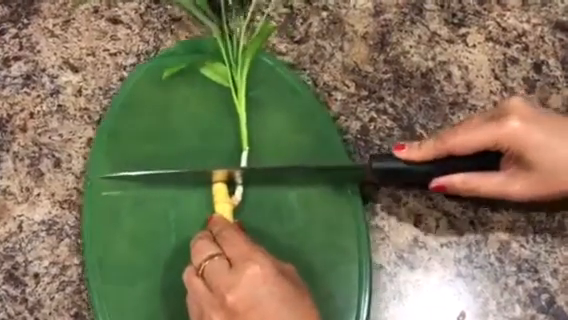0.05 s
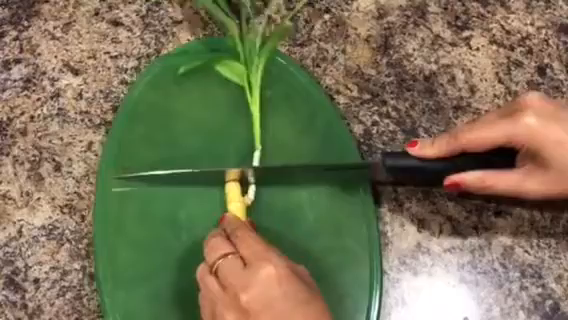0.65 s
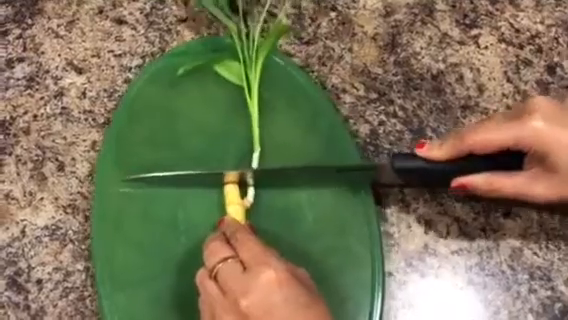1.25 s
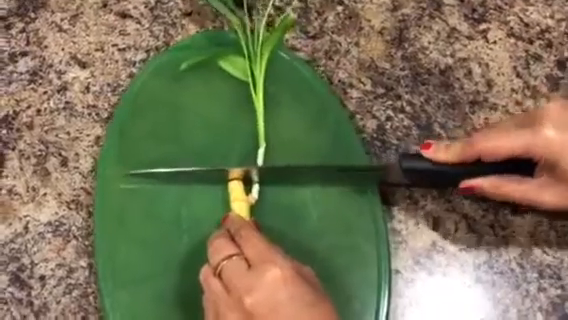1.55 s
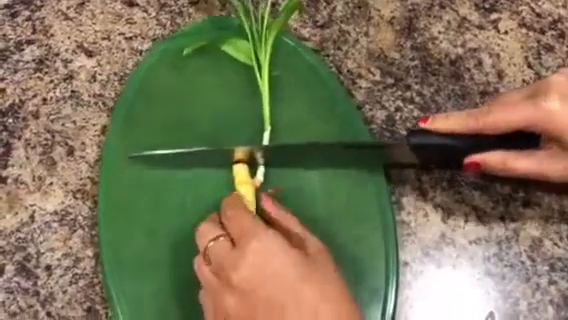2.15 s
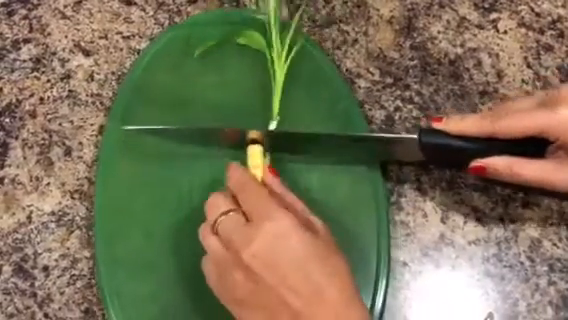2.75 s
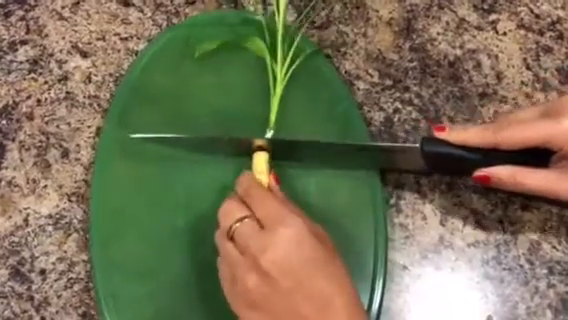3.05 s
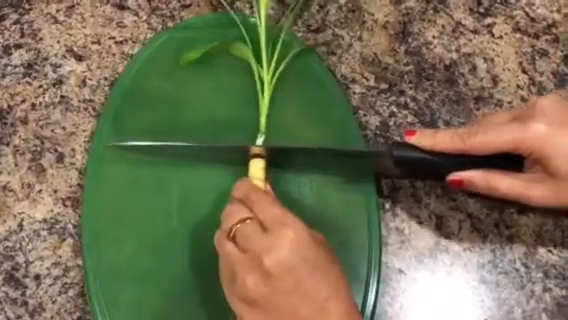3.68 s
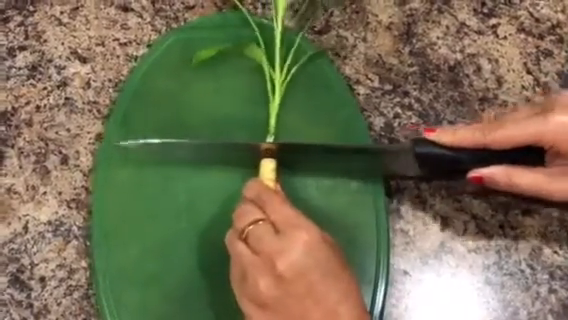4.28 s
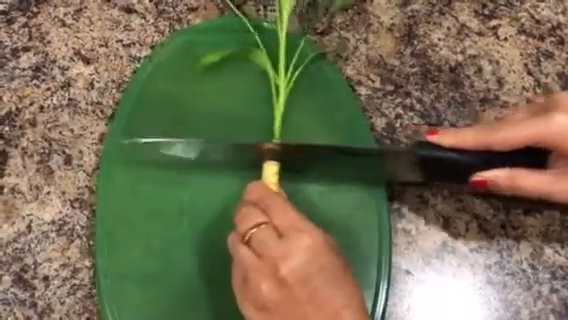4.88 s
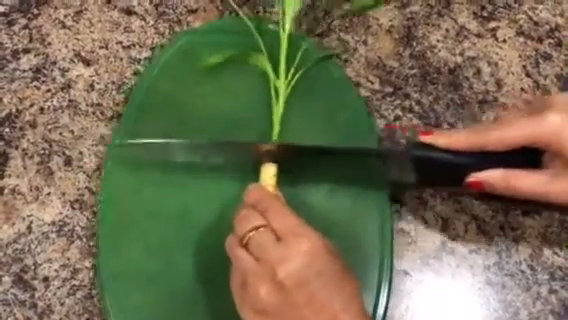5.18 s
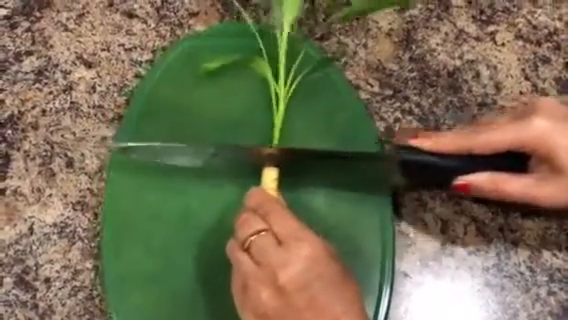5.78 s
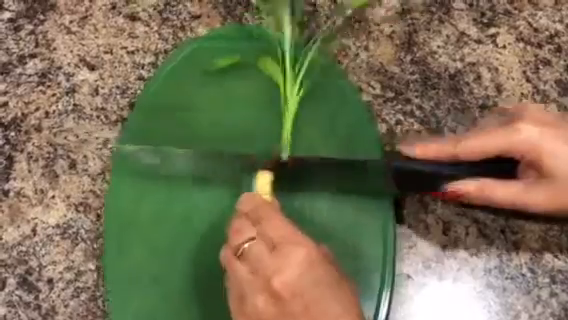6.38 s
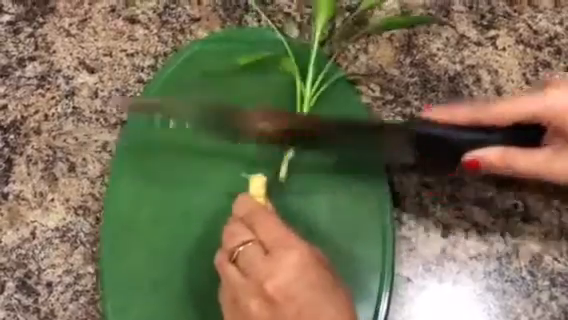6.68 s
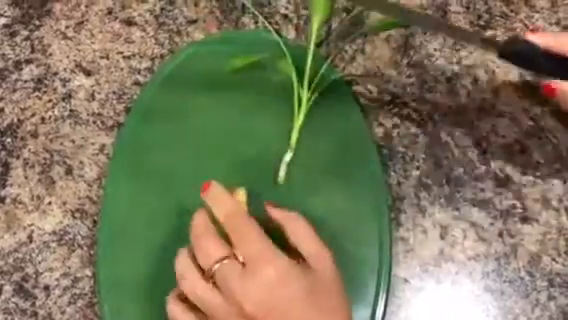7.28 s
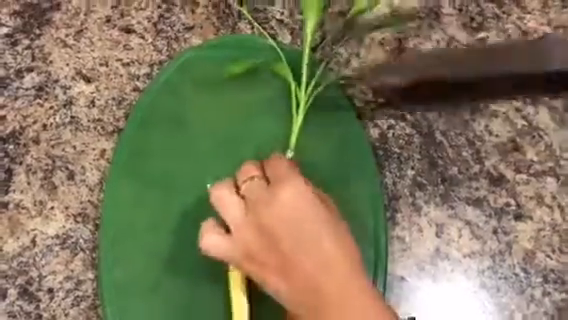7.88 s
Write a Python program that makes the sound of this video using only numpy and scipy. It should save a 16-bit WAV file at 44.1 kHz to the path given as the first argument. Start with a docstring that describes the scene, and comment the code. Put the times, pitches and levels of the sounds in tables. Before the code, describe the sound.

A few faint knife scrapes, ticks and a dull thud on a plastic cutting board lead into about three seconds of fast sawing through a fibrous stem. Small snaps build until the blade cracks down on the board, the loudest moment, followed by light handling taps. The microphone is close, with low kitchen room noise and an appliance humming behind.

```python
"""Sawing a stem on a cutting board

A kitchen, one small microphone close to a plastic board. A serrated knife saws through a plant stem
in runs of tiny slips: fibres hiss and snap, the blade rasps and the board drones underneath.
The stem rocks and knocks, then gives way, and the blade chops down; a hand gathers the pieces.
Behind it all, low room noise and the hum of an appliance."""
import sys
import numpy as np
from scipy import signal
from scipy.fft import rfft, irfft
from scipy.io import wavfile

SR = 44100
rng = np.random.default_rng(int(sys.argv[2]) if len(sys.argv) > 2 else 0)


def dump_mix(stems):
    """Bounce the given channels to the path in sys.argv[1] as a 16-bit WAV at rate SR."""
    frames = np.atleast_2d(stems).T  # one column per channel
    limited = np.clip(frames, -1, 1)  # hard clip at full scale
    pcm = np.round(limited * 32767).astype(np.int16)
    wavfile.write(sys.argv[1], SR, pcm)


N = 354255

# Close to the microphone, the blade saws to and fro about six strokes a second: t/s, length/s, force/dB
STROKES = [(3.304, .11, -52.5), (3.506, 0.068, -53), (3.668, 0.099, -54), (3.844, .11, -56),
           (4.02, 0.12, -51.5), (4.197, 0.1, -55), (4.35, .12, -51), (4.539, 0.088, -56),
           (4.686, 0.16, -50.5), (4.853, .13, -52), (5.026, .14, -50), (5.19, .11, -52), (5.323, 0.16, -51),
           (5.481, 0.17, -55), (5.652, .13, -50), (5.812, 0.12, -54.5), (5.951, .13, -50.5),
           (6.104, 0.16, -54), (6.262, .15, -51.5), (6.405, 0.16, -54)]
# From springy skin into woody core: t/s, drone/dB re force, rasp/dB re force, fizz of the wedged blade/dB
CUT_DEPTH = [(3.3, 3, -10, -65), (4.05, 10, -1.5, -66.5), (4.72, 10.5, -2, -62), (4.88, -1.5, -7.5, -67),
             (5.08, 7, 5, -54), (5.25, 2.5, -2.5, -63), (6.4, 6.5, 0, -59)]
# Light draws of the blade and brushes of the hand: t/s, length/s, rasp/dB, fibre hiss/dB
SCRAPES = [(0, 0.095, -55.5, -70), (0.124, 0.18, -61, -58.5), (0.33, 0.15, -55.5, -55.5),
           (0.534, .11, -46.5, -61), (0.601, 0.094, -53, -63), (0.703, 0.12, -57, -63.5),
           (0.933, 0.13, -62, -56), (1.193, 0.048, -59, -56.5), (1.237, 0.086, -64, -67),
           (1.762, 0.081, -64, -72), (2.154, 0.082, -65, -64), (2.273, 0.076, -66, -63.5),
           (2.324, 0.29, -61.5, -67), (2.745, .17, -66, -53), (2.968, 0.069, -68.5, -58),
           (3.05, 0.056, -75, -62.5), (6.48, .16, -54, -55.5), (7.802, .15, -68, -64)]


def sawing(freed_s=6.48, hiss_end_s=6.895, lingering_hiss_db=-65, leaves_db=-76.5):
    """Every stroke swells and fades with blade speed and drives the board, the rasp and the hiss."""
    t = np.arange(N) / SR
    depth_s, *depth = np.transpose(CUT_DEPTH)
    drone_db, rasp_db, wedged_db = (np.interp(t, depth_s, column) for column in depth)
    force = sum(amp(db) * blade_speed(t, start, length, fastest=0.17) for start, length, db in STROKES)
    drives = np.array([amp(drone_db) * force, amp(rasp_db) * force, force])
    for start, length, scrape_db, hiss_db in SCRAPES:
        speed = blade_speed(t, start, length, fastest=0.5)
        drives += np.outer(amp([scrape_db + 1.5, scrape_db, hiss_db]), speed)
    catch_db = 2.7 * noise_band(8.3, 89, order=1)  # the teeth catch and let go
    drone_drive, rasp_drive, hiss_drive = drives * unit_rms(amp(catch_db))
    drone, rasp = board_drone(), blade_rasp()
    # the handled plant and the wedged blade fizz; a faint hiss lingers after the chop, then cuts off
    stages = [t < depth_s[0], t < freed_s, t < hiss_end_s]
    fizz = amp(np.select(stages, [leaves_db, wedged_db, lingering_hiss_db], leaves_db - 3.5))
    press_db = np.interp(t, [4, 5], [-18, -2])  # the hand bears down harder as the cut deepens
    rumble = amp(press_db) * (t < freed_s) * noise_band(48, 97)
    return drone_drive * (drone + rumble) + rasp_drive * rasp + np.hypot(hiss_drive, fizz) * fibre_hiss()


def blade_speed(t, start, length, fastest):
    """One movement from rest to rest; `fastest` is the share of its length at which it peaks."""
    return np.sin(np.pi / 2 * np.interp((t - start) / length, [0, fastest, 1], [0, 1, 0]))


def slips(per_s, spread_db, smooth):
    """Random tiny slips of uneven size over a share of smooth rubbing."""
    sizes = amp(spread_db * np.minimum(rng.exponential(1, N), 4)) * rng.choice([-1, 1], N)
    ticks = unit_rms(sizes * (rng.random(N) < per_s / SR))
    return unit_rms(ticks + smooth * rng.standard_normal(N))


def board_drone():
    """Slips keep the board ringing under the cut, mixed with dull rubbing."""
    ring = board_ring(np.arange(SR // 4) / SR, damping=1.0, scatter_db=4.5)
    ringing = unit_rms(signal.oaconvolve(slips(per_s=590, spread_db=5, smooth=0.27), ring)[:N])
    rub = slips(per_s=700, spread_db=2.5, smooth=0.45)
    spectrum = [(150, -32.5), (240, -6.5), (320, 5), (620, -2.5), (900, -4), (1200, -17.5),
                (2000, -23.5), (5000, -48.5)]
    return unit_rms(colour(ringing + amp(1.5) * rub, spectrum))


# The teeth in the stem, heard close: f/Hz, level/dB
RASP_SPECTRUM = [(400, -42.5), (800, -3), (1050, 2.5), (1500, 3.5), (2000, -4), (2700, -11), (4000, -12.5),
                 (8000, -41)]


def blade_rasp():
    """Dense slips of the teeth merge into a midrange rasp."""
    return unit_rms(colour(slips(per_s=1500, spread_db=-1.5, smooth=0.24), RASP_SPECTRUM))


# Fibres tearing in the cut: f/Hz, level/dB
HISS_SPECTRUM = [(700, -30), (2000, -1.5), (3200, -5.5), (4800, -4), (5800, 1.5), (7200, -1), (7600, -6),
                 (8300, 0.5), (9700, -1), (10600, -7.5), (11600, -1), (15500, -7), (17000, -10.5)]


def fibre_hiss(bands=7):
    """Tearing fibres crackle: each thickness ticks in its own band, a few break with a broad click."""
    edges_hz = np.linspace(1500, 17000, bands + 1)
    narrow = sum(band(slips(per_s=590, spread_db=-0.5, smooth=0.46), lo, hi, order=2)
                 for lo, hi in zip(edges_hz, edges_hz[1:]))
    broad = slips(per_s=360, spread_db=0.5, smooth=0.2)
    return unit_rms(colour(unit_rms(narrow) + amp(-4.5) * broad, HISS_SPECTRUM))


# Thick fibres snapping and steel ticking, close by: t/s, peak level/dB
THICK_SNAPS = [(.373, -34), (.383, -36), (.417, -29.5), (.801, -41), (1.2022, -35.5), (1.211, -45),
               (1.519, -54), (2.0565, -47), (2.8392, -30.5), (3.318, -32), (3.5226, -35.5), (3.8717, -30),
               (4.0304, -33.5), (4.4328, -35), (5.1357, -34), (5.3996, -29), (5.549, -28.5), (5.666, -36),
               (5.678, -28), (6.024, -28), (6.147, -28.5), (6.1735, -31), (6.299, -24.5), (6.3336, -19.5),
               (6.4516, -11.5), (6.4766, -4.5), (6.4826, -8)]
# One snap: f/Hz, level/dB
SNAP_SPECTRUM = [(300, -27), (1500, -13), (2500, -3), (3400, -4.5), (4600, -4.5), (6000, 0), (8000, 0),
                 (10000, -2), (13000, -1), (17000, -11.5)]


def snaps(thin_per_stroke=2, thin_re_force_db=15):
    """A fibre parts with a sharp tick and brief splintering; thin ones go at random in every stroke."""
    t, out = np.arange(SR // 20) / SR, np.zeros(N)
    splinters = (np.exp(-t / 0.001) + 0.25 * np.exp(-t / 0.0045)) * (1 - np.exp(-t / 0.0002))
    thin_snaps = [(start + length * rng.beta(2, 2), rng.normal(force_db + thin_re_force_db, 1.5))
                  for start, length, force_db in STROKES for _ in range(thin_per_stroke)]
    for start, peak_db in THICK_SNAPS + thin_snaps:
        tick = colour(rng.standard_normal(len(t)) * splinters, SNAP_SPECTRUM)
        add(out, start, amp(peak_db) * tick / abs(tick).max())
    return out


# The blade breaks through in quick cracks, close by: t/s, level/dB
CHOP_CRACKS = [(6.476, -14), (6.4836, -18.5), (6.489, -24.5)]
# One crack: f/Hz, level/dB
CRACK_SPECTRUM = [(40, -14.5), (120, -2), (200, 5), (300, 2), (450, 5), (520, 4.5), (650, -2), (830, 1.5),
                  (1100, 2), (1500, 3), (2000, -5.5), (2600, -0.5), (3200, -6), (4000, -9), (7000, -15.5),
                  (16000, -34)]


def chop():
    """The blade breaks through the last of the stem and cracks down on the board."""
    t, out = np.arange(SR // 3) / SR, np.zeros(N)
    for start, db in CHOP_CRACKS:
        burst = rng.standard_normal(len(t)) * np.exp(-t / 0.0049)
        add_hit(out, start, db, colour(burst, CRACK_SPECTRUM))
    return out


def board_slap():
    """The chop drives the board against the counter, where it rings."""
    t, out = np.arange(SR // 3) / SR, np.zeros(N)
    ring = board_ring(t, damping=1.15, scatter_db=0.5) * (1 - np.exp(-t / 0.004))
    add_hit(out, start=6.479, db=-14, sound=ring)
    return out


# The stem rocks and knocks on the board, close by: t/s, body level/dB, note f/Hz
STEM_KNOCKS = [(.19, -50, 261), (.417, -41.5, 320), (2.354, -51.5, 900), (2.419, -48, 313),
               (2.496, -47, 430), (2.617, -40.5, 340), (2.638, -43, 400), (2.666, -44, 490),
               (2.712, -46, 784), (2.992, -50, 270), (3.318, -44.5, 303), (3.521, -44.5, 960),
               (3.682, -34.5, 320), (3.692, -32, 308), (4.029, -34, 617), (4.057, -33, 614),
               (4.388, -37, 613), (4.42, -38.5, 400), (4.702, -46, 450), (4.737, -43, 560),
               (5.038, -48, 820), (6.28, -43.5, 874), (6.334, -45.5, 300), (6.897, -51, 427),
               (7.371, -35, 288), (7.387, -41.5, 359), (7.535, -50.5, 332), (7.743, -52, 407),
               (7.825, -51, 399), (7.999, -44, 816)]
# A hard contact on the board: f/Hz, level/dB
CLACK_SPECTRUM = [(400, -30), (1100, 3.5), (1600, 2.5), (2500, -8), (4000, -11.5), (7000, -15.5),
                  (16000, -31)]


def stem_knocks():
    """The pressed stem gives a short woody note; weight adds a thump, hardness a clack."""
    t, out = np.arange(SR // 3) / SR, np.zeros(N)
    for start, body_db, hz in STEM_KNOCKS:
        ring, blow = contact(t)
        note = np.sin(2 * np.pi * hz * t) * np.exp(-t / 0.006) * (1 - np.exp(-t / 0.0004))
        body = unit_rms(note) + amp(-1.5) * unit_rms(band(blow, hz / 1.69, hz * 1.6, order=2))
        thump = band(ring, 41, 210)
        squash_db = 0.56 * (body_db + 42.5)  # harder knocks squash the stem, so the clack grows less
        add_hit(out, start, body_db, body)
        add_hit(out, start, body_db - 15.5, thump)
        add_hit(out, start, body_db - 11.5 - squash_db, colour(blow, CLACK_SPECTRUM))
    return out


# The board is pressed down onto the counter: t/s, thump level/dB, clack level/dB
BOARD_THUDS = [(1.047, -51, -66), (1.519, -24, -37), (7.373, -44, -63)]
# The clack between board and counter: f/Hz, level/dB
COUNTER_SPECTRUM = [(400, -10), (1100, -4), (1550, 3), (1900, -6), (2500, -3), (3300, -11.5), (4500, -13),
                    (7000, -22), (16000, -37)]


def board_thuds():
    """The board flexes and meets the counter: a clack, a quickly falling note and a low ring."""
    t, out = np.arange(SR // 3) / SR, np.zeros(N)
    bend_hz = 215 + 380 * np.exp(-t / 0.00302)  # bending waves: the short ones arrive first
    envelope = np.exp(-t / 0.0075) * (1 - np.exp(-t / 0.0015))
    bend = unit_rms(np.sin(2 * np.pi * np.cumsum(bend_hz) / SR) * envelope)
    for start, thump_db, clack_db in BOARD_THUDS:
        ring, blow = contact(t)
        low_ring = amp(-5) * unit_rms(band(ring, 45, 106)) + amp(-6) * unit_rms(band(ring, 113, 645))
        add_hit(out, start, thump_db, bend + low_ring)
        add_hit(out, start, clack_db, colour(blow * np.exp(-t / 0.0034), COUNTER_SPECTRUM))
    return out


def contact(t):
    """One tap somewhere on the board: (its ring, the ring with the crunch of the rough contact)."""
    ring = board_ring(t, damping=0.96, scatter_db=6)
    crunch = rng.standard_normal(len(t)) * np.exp(-t / 0.0086)
    return ring, ring + amp(10.5) * crunch


# Modes of the plastic board lying on the counter: f/Hz, level/dB, t60/s at damping 1
BOARD_MODES = [(62.4, -11, 0.18), (140, 1.5, 0.1), (223, -4, .11), (299, -1.5, 0.12), (363, -6.5, 0.055),
               (487, -3.5, 0.063), (567, -12, 0.083), (646, -3, 0.061), (836, 4.5, 0.071), (903.4, -5, .08),
               (1056, -3, 0.07), (1178, -4.5, 0.036), (1332, -9, 0.03), (1592, -5.5, .045),
               (1850, -6.5, 0.09), (2313, -4, 0.071), (2498, -6.5, 0.058), (2590, -11, .05),
               (3300, 1.5, 0.033), (3300, -9.5, 0.037), (4100, -13.5, 0.095)]


def board_ring(t, damping, scatter_db):
    """The board's answer to one tap; each spot favours other modes."""
    hz, db, t60 = np.transpose(BOARD_MODES)[:, :, None]
    spot_db = scatter_db * rng.standard_normal(hz.shape)
    sign = rng.choice([-1, 1], hz.shape)
    envelopes = amp(db + spot_db - 60 * damping * t / t60)
    return (sign * envelopes * np.sin(2 * np.pi * hz * t)).sum(0)


def kitchen_reverb(x, tails=5, turn_s=0.005):
    """Bass rings in one room tail; treble is spread over several in quick rotation and fades smoothly."""
    turns = np.arange(N) / (turn_s * SR)
    bass, treble = band(x, 30, 560), band(x, 600, 20000)
    wet = signal.fftconvolve(bass, room_tail())
    for k in range(tails):
        share = np.maximum(np.cos(2 * np.pi * (turns - k / tails)), 0)
        wet += signal.fftconvolve(treble * share, room_tail())
    spectrum = [(30, -15.5), (100, -7), (400, -12), (1200, -15.5), (3000, -17), (7000, -18),
                (14000, -20.5)]
    return colour(wet[:N], spectrum)


# Decay of the kitchen around the microphone: f/Hz, t60/s
KITCHEN_DECAY = [(80, 0.57), (300, 0.26), (1000, 0.64), (2500, 0.53), (6000, .42), (14000, 0.32)]


def room_tail():
    """Sparse reflections of random sign, each band dying at its own speed."""
    taps = np.zeros(SR)
    slots = np.arange(SR // 200, SR - 20, 20)
    taps[slots + rng.integers(0, 20, len(slots))] = rng.choice([-1., 1.], len(slots))
    hz, t, bands = signal.stft(taps, SR, nperseg=256)
    decay = amp(-60 * t / curve_at(KITCHEN_DECAY, hz)[:, None])
    tail = signal.istft(bands * decay, SR, nperseg=256)[1]
    return tail / np.linalg.norm(tail)


# The kitchen's own noise at the microphone: f/Hz, relative level/dB
ROOM_TONE_SPECTRUM = [(15, -45), (25, -25), (43, -4), (66, 0), (87, -20), (123, 1.5), (149, -8),
                      (229, -12.5), (256, -14), (1130, -30), (1230, -30), (2110, -36.5), (3080, -38.5),
                      (3340, -40), (16000, -54.5)]
# An appliance in the background: f/Hz, level/dB
APPLIANCE_HUM = [(55, -58), (119, -68)]


def room_tone(noise_db=-51.5, whine_db=-79):
    """Low room noise with a wavering appliance hum and a soft whine."""
    t = np.arange(N) / SR
    gains = amp(curve_at(ROOM_TONE_SPECTRUM, np.fft.rfftfreq(N, 1 / SR)))
    out = amp(noise_db) * unit_rms(irfft(rfft(rng.standard_normal(N)) * gains, N))
    for hz, db in APPLIANCE_HUM:
        waver = np.interp(t, np.linspace(0, t[-1], 64), rng.standard_normal(64))
        out += amp(db) * unit_rms(np.sin(2 * np.pi * hz * t + 0.27 * waver))
    return out + amp(whine_db) * noise_band(2680, 3050)


def amp(db):
    return 10 ** (np.asarray(db) / 20)


def unit_rms(x):
    return x / np.sqrt(np.mean(x ** 2) + 1e-20)


def curve_at(points, hz):
    """Joins (f/Hz, value) points by lines on a log-frequency axis."""
    f, value = np.transpose(points)
    return np.interp(np.log(hz + 1), np.log(f + 1), value)


def add(mix, start, sound):
    """Mixes a sound in at `start` seconds."""
    part = mix[max(round(start * SR), 0):][:len(sound)]
    part += sound[:len(part)]


def add_hit(mix, start, db, sound):
    """Mixes an impact in with its first 20 ms at the given level."""
    add(mix, start, amp(db) * sound / np.std(sound[:SR // 50]))


def band(x, lo_hz, hi_hz, order=3):
    """Causal band-pass."""
    return signal.sosfilt(signal.butter(order, [lo_hz, hi_hz], "band", fs=SR, output="sos"), x)


def noise_band(lo_hz, hi_hz, order=2):
    """Band-passed noise at rms 1."""
    return unit_rms(band(rng.standard_normal(N), lo_hz, hi_hz, order))


def colour(x, spectrum, size=4096):
    """Causal filter through (f/Hz, level/dB) points, so that clicks keep their attack."""
    log_gain = np.log(amp(curve_at(spectrum, abs(np.fft.fftfreq(size, 1 / SR)))))
    taps = np.fft.ifft(np.exp(np.conj(signal.hilbert(log_gain)))).real
    return signal.oaconvolve(x, taps[:size // 2])[:len(x)]


def scene():
    """Knife, stem and board close up, the kitchen behind them, in mono."""
    near = sawing() + stem_knocks() + board_thuds() + chop() + snaps()
    slap = board_slap()
    room = kitchen_reverb(near + amp(-9.5) * slap)  # lying flat, the board sends little into the room
    return (near + slap + room + room_tone())[None]


def record(dry, ceiling=0.95, top_hz=16200):
    """The small microphone loses deep bass and rounds off the loudest peaks; then the band limit."""
    rounded = ceiling * np.tanh(band(dry, 40, 21000, order=2) / ceiling)
    low_pass = signal.firwin(401, top_hz, window=("kaiser", 9), fs=SR)
    return signal.oaconvolve(rounded, low_pass[None], "same")


dry = scene()
out = record(dry)
dump_mix(out)
```